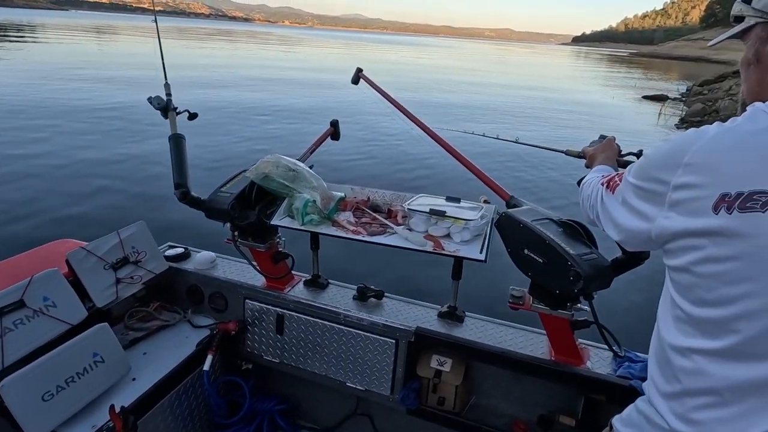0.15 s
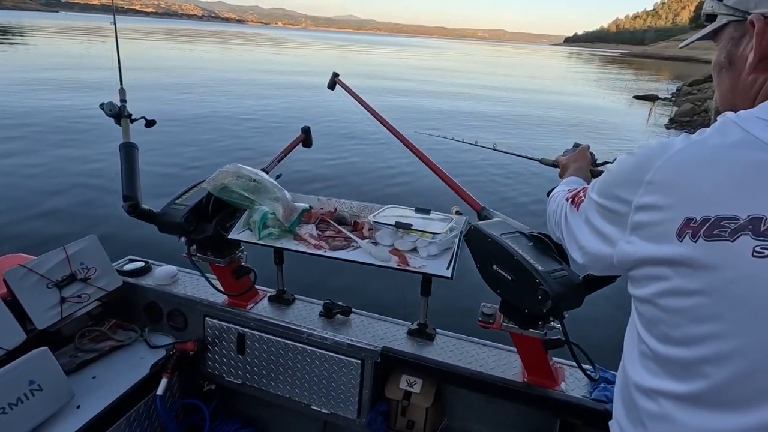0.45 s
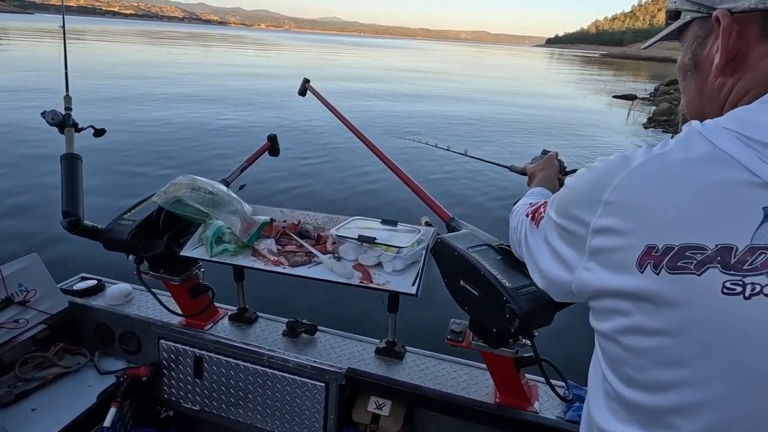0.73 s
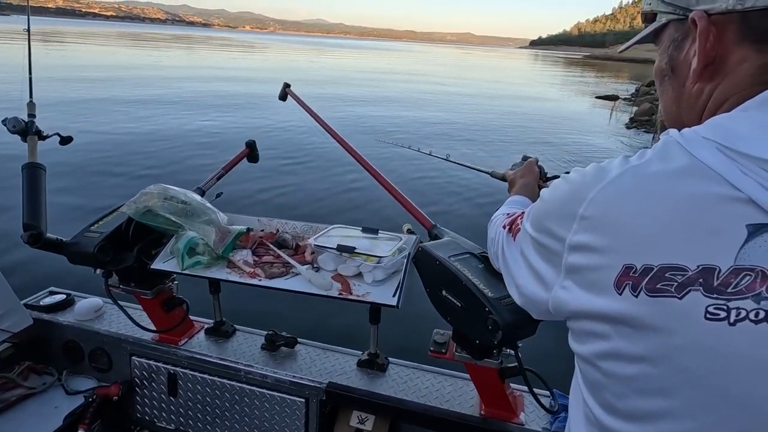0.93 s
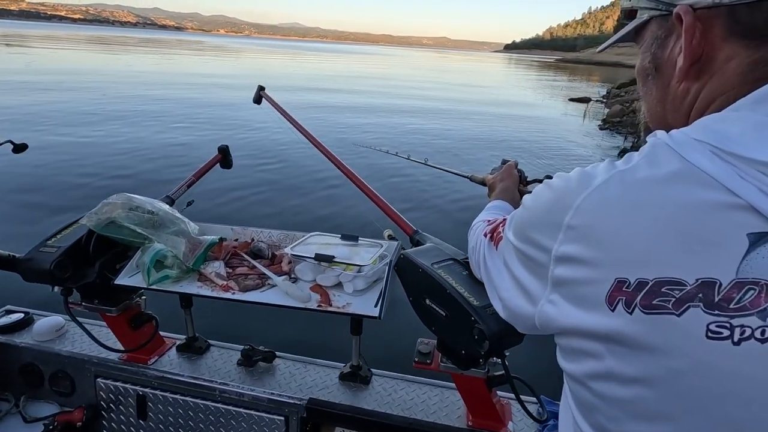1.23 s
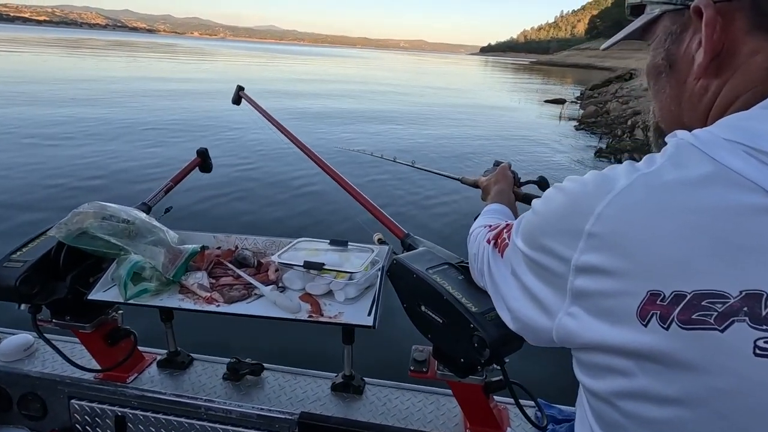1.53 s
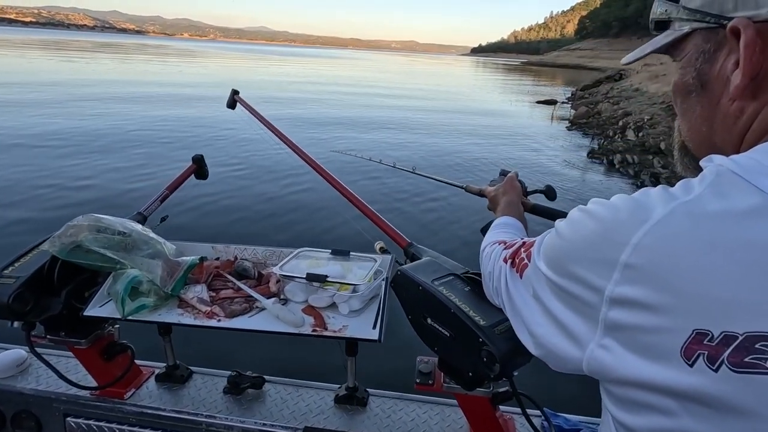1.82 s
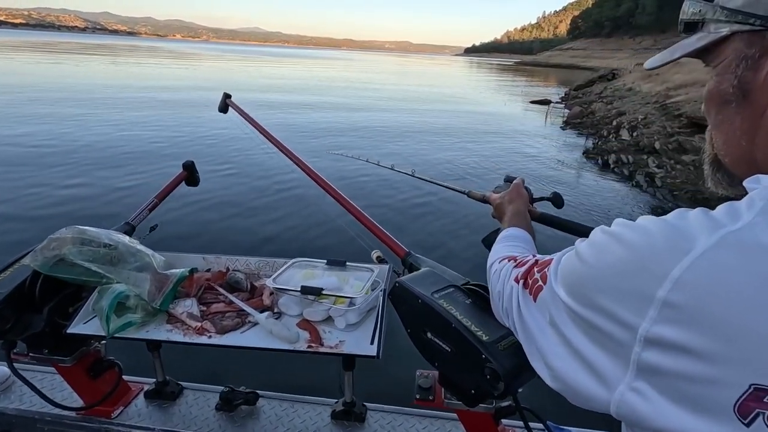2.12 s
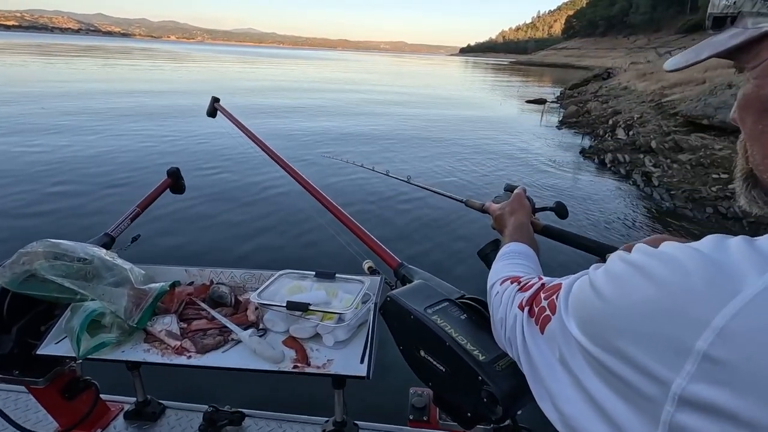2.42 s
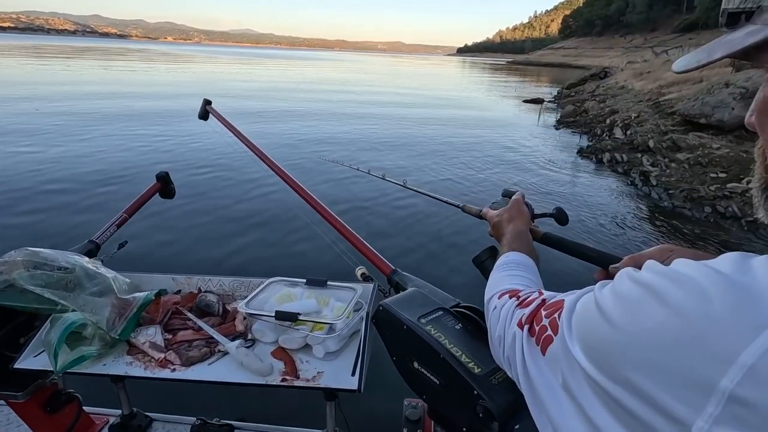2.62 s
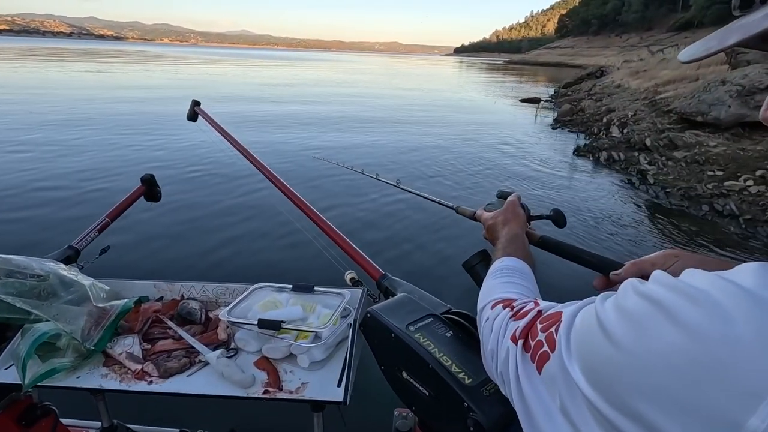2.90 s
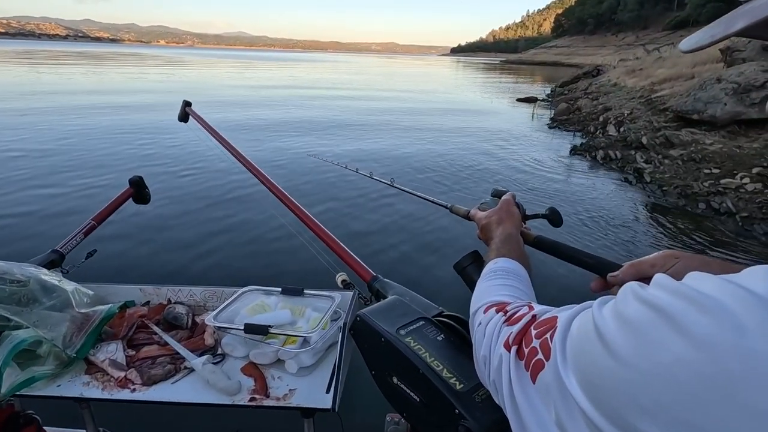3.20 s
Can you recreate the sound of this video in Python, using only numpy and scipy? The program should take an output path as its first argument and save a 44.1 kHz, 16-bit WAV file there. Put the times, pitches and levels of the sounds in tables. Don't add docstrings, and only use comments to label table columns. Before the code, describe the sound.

Knocking and clattering in an aluminium boat as an angler shifts and handles a rod over calm water

```python
import sys
import numpy as np
from scipy import signal
from scipy.fft import rfft, irfft
from scipy.io import wavfile
from scipy.ndimage import uniform_filter1d

SR = 44100
rng = np.random.default_rng(int(sys.argv[2]) if len(sys.argv) > 2 else 0)


def output_pcm(signal):
    pcm = np.clip(np.atleast_2d(signal).T, -1, 1) * 32767
    wavfile.write(sys.argv[1], SR, np.round(pcm).astype(np.int16))


def decibels_to_gain(level_db):
    exponent = np.asarray(level_db, float) / 20
    return 10 ** exponent


N = 147735

# freq_hz, level_db
AIR_SPECTRUM = [(30, -4.5), (70, -13), (110, -13.5), (170, -3), (400, -1.5), (600, -0.5), (900, -1.5),
                (4800, -14), (8000, -28), (10000, -59.5)]
# time_s, level_db
AIR_SWELL = [(0, 0.5), (.6, -1), (1.1, -2.5), (1.45, 3), (1.7, 4), (2.5, 3), (3.35, 0)]
AIR_DB, AIR_FIZZ_DB = -55.5, -84
MURMUR_FLICKER_DB, HISS_FLICKER_DB, FIZZ_FLICKER_DB = 2.5, 1.2, 0.83

SCRAPE_START_S = [0, .72, 1.77, 2.1, 2.13, 2.265, .39]
# swell_s, hold_s, fade_s, level_db
SCRAPES = [
    (0.019, 0.014, 0.033, -55.5),
    (0.05, 0.022, 0.14, -44.5),
    (0.022, 0.07, 0.15, -49.5),
    (0.013, 0.072, 0.043, -46),
    (0.017, 0.0088, 0.026, -36),
    (0.0015, 0.066, 0.089, -43),
    (0.0091, 0.038, 0.07, -58),
]
SCRAPE_PITCH_HZ = [2480, 1190, 1790, 1530, 5500, 3500, 4000]
SCRAPE_TREBLE_DB = [-39, -37, -51, -27.5, -42, -32, -50]
# freq_hz, level_db
CONTACT_BODY = [(240, -2), (400, 7), (1090, -8), (1330, -6), (3290, -9.5), (4020, -13), (6000, -22),
                (8000, -42.5), (10400, -60), (17600, -120)]
# freq_hz, level_db
DULL = [(6500, -2), (8500, -11), (14000, -48)]
TREBLE_HZ, TREBLE_WIDTH_HZ, GRIT_DB = 10800, 3500, 3

# freq_hz, level_db, t60_s
HULL_MODES = [(58, -18.5, 0.61), (90.4, -6, 0.25), (145.4, -11, 0.19), (187, -2, 0.14), (215.2, -5, 0.13),
              (265.5, -0.5, 0.087), (320.2, -5, 0.077), (393.4, -4, 0.099), (472, -18.5, 0.14),
              (517.6, -7.5, 0.14), (621, 1, 0.069), (795, -11, 0.13), (879, -11, 0.15)]
# start_s, peak_db, struck_hz, ring_ratio
KNOCKS = [(0.02, -43, 256, 1), (0.054, -40, 180, 1), (0.118, -22.5, 250, 1), (0.165, -24, 138, 0.12),
          (0.284, -12.5, 380, 0.55), (0.118, -39, 585, 0.39), (.185, -33, 410, .4), (1.469, -48, 65, 0.43),
          (2.41, -49, 109, 0.48), (2.163, -28.5, 775, 0.18), (0.564, -41, 208, 0.78),
          (1.452, -41, 186, 0.23), (1.52, -30, 344, 1), (1.975, -20.5, 172, 0.22),
          (2.175, -28.5, 232, 0.76), (2.258, -23, 270, 0.47), (2.262, -29, 560, 0.51),
          (2.335, -37, 324, 0.79), (2.701, -27.5, 315, 1)]
# start_s, peak_db, struck_hz, ring_ratio
FURTHER_KNOCKS = [
    (0.297, -17.5, 270, 0.82),
    (.316, -20.5, 270, 1.02),
    (0.769, -21.5, 190, 0.68),
    (0.784, -25.5, 181, 0.35),
    (1.542, -37, 187, 0.29),
    (2.035, -28.5, 280, 0.92),
    (2.211, -32, 203, 0.48),
    (2.731, -30, 270, 0.35),
]
REACH_OCT, PUSH_S = 0.62, 0.006
BOOM_DB, BOOM_T60_S, BOOM_HZ = -25, 0.7, 270

RUB_START_S = [.67, 1.752, 2.05, .13, 2.28, 1.8, .7, 2.07, 1.76]
# swell_s, hold_s, fade_s, level_db
RUBS = [
    (0.044, 0.1, 0.11, -38.5),
    (0.032, 0.18, 0.03, -34),
    (0.065, 0.1, 0.023, -38.5),
    (0.014, 0.22, 0.25, -39),
    (0.028, 0.063, 0.12, -43.5),
    (0.078, 0.25, 0.23, -42),
    (0.075, 0.032, 0.059, -39.5),
    (0.099, 0.014, 0.029, -40),
    (0.063, 0.11, 0.07, -40),
]
# slip_rate_hz, unevenness_ratio
RUB_SLIPS = [(190.2, 0.259), (63.14, 0.1245), (92.4, 0.31), (73.9, 0.243), (106.3, 0.366), (45.7, 0.335),
             (284, 0.396), (250, 0.65), (126.5, 0.1994)]
RUB_PITCH_HZ = [198, 280, 210, 134.4, 413, 78, 485, 690, 567]

# start_s, peak_db, pitch_hz, t60_s, treble_db
CLICKS = [(0.158, -33.5, 2600, 0.11, -53), (0.2403, -29, 1530, 0.12, -44),
          (0.2788, -13.5, 2750, 0.077, -43), (0.286, -19, 2560, 0.049, -55),
          (1.514, -28.5, 2700, 0.099, -51), (1.8439, -22, 2150, 0.022, -42),
          (1.8738, -22.5, 2440, 0.075, -59), (1.924, -23, 2110, 0.072, -51),
          (2.0319, -23.5, 1980, 0.053, -53), (2.0953, -37, 1590, 0.094, -41), (2.148, -32, 1730, 0.16, -42),
          (2.26, -29, 5130, 0.13, -18), (2.4287, -29.5, 2100, 0.089, -30), (2.5142, -44.5, 3500, 0.16, -17),
          (2.6943, -27.5, 1600, 0.17, -29), (2.7539, -14.5, 3360, 0.048, -15.5),
          (2.7738, -30.5, 4210, 0.089, -48), (2.866, -13, 1496, 0.086, -41),
          (3.0625, -25, 1950, 0.1, -37.5)]
CLICK_RISE_S, CLICK_RING_DB, CLICK_Q = 0.0044, -6, 3.9

# freq_hz, width_hz, level_db
REEL_BODY = [(1610, 31, -2), (2240, 50, 4.5), (2590, 24, -4.5), (3300, 60, -8), (3700, 64, -12),
             (4570, 41, -13), (4830, 51, -16), (5600, 25, -13), (7000, 41, -10)]
# freq_hz, width_hz, level_db
RATTLE_BODY = [(760, 47, 2), (1600, 41, -2), (1740, 23, -11), (1970, 33, -7), (2870, 240, -18)]
# freq_hz, width_hz, level_db
BUTT_BODY = [(604, 50, 4.5), (1367, 57, -9.5), (1540, 29, -12), (1860, 28, -15), (2110, 49, -7.5),
             (2600, 29, -8.5), (2990, 50, -17), (3665, 20, -12)]
# freq_hz, width_hz, level_db
BAIL_BODY = [(2210, 71, -4.5), (3120, 410, 4), (4390, 210, -1), (4850, 80, -13), (5190, 240, -10),
             (5860, 130, -10)]
# freq_hz, width_hz, level_db
RAIL_BODY = [(1620, 78, 3), (2115, 15, -3), (2520, 190, -1.5), (3160, 37, -2.5), (4150, 120, -19.5)]
SINGING_BODIES = [REEL_BODY, RATTLE_BODY, BUTT_BODY, BAIL_BODY, RAIL_BODY, RAIL_BODY]
SINGING_START_S = [2.262, 2.1, .279, 2.753, 2.865, 3.062]
# swell_s, hold_s, fade_s, level_db
SINGING = [
    (0.011, 0.096, .06, -46.5),
    (0.041, 0.048, 0.064, -44),
    (0.0072, 0.0063, 0.034, -24),
    (0.0021, 0.0087, 0.02, -24),
    (.003, 0.0045, 0.035, -27.5),
    (0.0014, 0.0029, 0.032, -40),
]
WASH_DB, WASH_T60_S, WASH_HZ = -25, 0.4, 900

# start_s, peak_db, pitch_hz
PINGS = [
    (0.385, -44, 4000),
    (0.588, -41, 1600),
    (1.265, -52, 4740),
    (1.165, -50, 2320),
    (1.319, -41, 4870),
    (1.417, -45.5, 3500),
    (1.846, -51.5, 6830),
    (2.83, -49, 7100),
    (2.851, -40, 5300),
]
# start_s, peak_db, pitch_hz
TICKS = [
    (1.2376, -55.5, 11200),
    (1.778, -56.5, 10370),
    (2.5262, -66, 11500),
    (2.605, -55.5, 10500),
    (2.846, -54, 10500),
    (2.991, -58, 11300),
    (3.1844, -61, 10800),
    (3.3197, -52.5, 10700),
]
TICK_T60_S = 0.018

# start_s, peak_db, struck_hz
CREAK_SLIPS = [(1.768, -35, 330), (1.791, -29, 344), (1.814, -26.5, 330), (1.842, -25.5, 294),
               (1.853, -24, 310), (1.873, -28, 352), (1.883, -23, 334), (1.91, -25, 284), (1.923, -30, 353),
               (1.934, -24, 290), (1.951, -29, 250)]
CREAK_RING, CREAK_PUSH_S = 0.35, 0.0015

# start_s, peak_db, first_hz, last_hz, length_s
BUBBLES = [
    (2.588, -48.5, 624, 900, 0.029),
    (2.602, -46.5, 850, 1190, 0.028),
    (2.619, -51, 477, 760, .03),
]

# start_s, peak_db
BLOWS = [
    (2.8645, -8),
    (3.0605, -15),
]
# delay_s, level_db, struck_hz, ring_ratio, push_s
BLOW_PARTS = [
    (.001, 0, 270, 0.49, 0.0014),
    (0.0104, -7, 250, 0.37, .003),
    (0.017, -5, 320, 1.26, .003),
    (.036, -4.5, 262, 0.2, .012),
    (.062, -20, 254, .25, .015),
    (.08, -23.5, 266, 6.7, .02),
]

NOTCH_HZ, NOTCH_WIDTH_HZ, NOTCH_DB = 9140, 1200, -6.5
# freq_hz, level_db
MIC = [(20, -30), (60, -4), (130, 0), (NOTCH_HZ - NOTCH_WIDTH_HZ, 0), (NOTCH_HZ, NOTCH_DB),
       (NOTCH_HZ + NOTCH_WIDTH_HZ, 0), (13000, -3), (14400, -20), (14700, -80)]


def colour(x, table):
    hz, db = np.array(table, float).T
    f = np.maximum(np.arange(len(x) // 2 + 1) * SR / len(x), 1)
    return irfft(rfft(x) * decibels_to_gain(np.interp(np.log(f), np.log(hz), db)), len(x))


def unit(x):
    return x / np.sqrt(np.mean(x ** 2))


def band(x, hz, width_hz):
    return signal.lfilter(*signal.iirpeak(min(hz, .45 * SR), max(hz / width_hz, .4), fs=SR), x)


def band_twice(x, hz, width_hz):
    return band(band(x, hz, width_hz), hz, width_hz)


def add(out, start_s, x):
    i = max(int(start_s * SR), 0)
    out[i:i + len(x)] += x[:N - i]


def walk(rate_hz, count=N):
    k = max(int(SR / rate_hz), 1)
    return uniform_filter1d(np.repeat(rng.standard_normal(count // k + 1), k), k)[:count]


def swell(start_s, rise_s, hold_s, fade_s, count=N):
    t = np.arange(count) / SR - start_s
    fall = np.clip((t - rise_s - hold_s) / fade_s, 0, 9)
    return np.clip(t / rise_s, 0, 1) ** 2 * decibels_to_gain(-30 * fall)


def diffuse(x, hz, width_hz, t60_s, build_s):
    t = np.arange(SR) / SR
    tail = band(rng.standard_normal(SR), hz, width_hz)
    tail *= decibels_to_gain(-60 * t / t60_s) * (1 - np.exp(-t / build_s))
    return signal.fftconvolve(x, tail / np.sqrt(np.sum(tail ** 2)))[:N]


def air():
    hiss = unit(colour(rng.standard_normal(N), AIR_SPECTRUM))
    murmur = band(band(hiss, 220, 300), 220, 400)
    rest = hiss - murmur
    bed = murmur * decibels_to_gain(MURMUR_FLICKER_DB * walk(10)) + rest * decibels_to_gain(HISS_FLICKER_DB * walk(18))
    fizz = unit(band_twice(rng.standard_normal(N), 11000, 3500)) * decibels_to_gain(FIZZ_FLICKER_DB * walk(11))
    time_s, level_db = np.array(AIR_SWELL).T
    level = decibels_to_gain(np.interp(np.arange(N) / SR, time_s, level_db))
    return (decibels_to_gain(AIR_DB) * unit(bed) + decibels_to_gain(AIR_FIZZ_DB) * fizz) * level


def gritty(count, hz, ring_db, treble_db, q):
    noise = rng.standard_normal((3, count)) * decibels_to_gain(GRIT_DB * walk(400, count=count))
    highpass = signal.butter(2, min(hz * 0.3, 5000.), "high", fs=SR)
    body = unit(colour(signal.lfilter(*highpass, noise[0]), CONTACT_BODY))
    ring = unit(colour(band(band(noise[1], hz, hz / q), hz, hz), DULL))
    fizz = unit(band_twice(noise[2], TREBLE_HZ, TREBLE_WIDTH_HZ))
    return unit(body + decibels_to_gain(ring_db) * ring) + decibels_to_gain(treble_db) * fizz


def scrapes():
    out, count = np.zeros(N), SR // 2
    events = zip(SCRAPE_START_S, SCRAPES, SCRAPE_PITCH_HZ, SCRAPE_TREBLE_DB)
    for start_s, (rise_s, hold_s, fade_s, db), hz, treble_db in events:
        shape = swell(0, rise_s, hold_s, fade_s, count=count)
        add(out, start_s, decibels_to_gain(db) * shape * gritty(count, hz, 0, treble_db, 1))
    return out


def strike(hz, ring, push_s=PUSH_S, reach_oct=REACH_OCT):
    t = np.arange(SR // 3)[:, None] / SR
    f, db, t60_s = np.array(HULL_MODES).T
    off_pitch_db = 8.76 * (np.log2(f / hz) / reach_oct) ** 2 * np.sqrt(push_s / PUSH_S)
    gain = decibels_to_gain(db - off_pitch_db) * (-1.) ** np.arange(len(f))
    decay = decibels_to_gain(-60 * t / (t60_s * max(ring, .1)))
    x = (gain * np.sin(2 * np.pi * f * t) * decay).sum(axis=1)
    x *= 1 - np.exp(-t[:, 0] / push_s)
    return x / np.abs(x).max()


def knocks():
    out = np.zeros(N)
    for start_s, db, hz, ring in KNOCKS + FURTHER_KNOCKS:
        add(out, start_s, decibels_to_gain(db) * strike(hz, ring))
    return out


def rubs():
    out = np.zeros(N)
    events = zip(RUB_START_S, RUBS, RUB_SLIPS, RUB_PITCH_HZ)
    for start_s, (rise_s, hold_s, fade_s, db), (rate_hz, uneven), hz in events:
        chance = rng.standard_normal((400, 2))
        slip_s = (np.cumsum(np.abs(1 + uneven * chance[:, 0])) - 1) / rate_hz
        at = (slip_s * SR).astype(int).clip(0, SR - 1)
        slips, rub = np.zeros(SR), np.zeros(N)
        slips[at] = decibels_to_gain(2 * chance[:, 1])
        response = strike(hz, 0.4, push_s=0.0038, reach_oct=0.78)
        add(rub, start_s, unit(signal.fftconvolve(slips, response)[:SR]))
        out += decibels_to_gain(db) * rub * swell(start_s, rise_s, hold_s, fade_s)
    return out


def clicks():
    out, t = np.zeros(N), np.arange(SR // 4) / SR
    for start_s, db, hz, t60_s, treble_db in CLICKS:
        decay = decibels_to_gain(-60 * t / t60_s) + decibels_to_gain(-48 - 15 * t / t60_s)
        shape = np.clip(t / CLICK_RISE_S, 0, 1) * decay
        burst = gritty(len(t), hz, CLICK_RING_DB, treble_db, CLICK_Q)
        add(out, start_s - .001, decibels_to_gain(db - 5.5) * shape * burst)
    return out


def singing():
    out, count = np.zeros(N), SR // 4
    for start_s, (rise_s, hold_s, fade_s, db), body in zip(SINGING_START_S, SINGING, SINGING_BODIES):
        ring = np.zeros(count)
        for hz, width_hz, part_db in body:
            tone = unit(band(rng.standard_normal(count), hz, width_hz))
            ring += decibels_to_gain(part_db + 3.2 * walk(60, count=count)) * tone
        shape = swell(0, rise_s, hold_s, fade_s, count=count)
        add(out, start_s, decibels_to_gain(db) * shape * unit(colour(ring, DULL)))
    return out


def pings_and_ticks():
    out, t = np.zeros(N), np.arange(SR // 4) / SR
    for start_s, db, hz in TICKS + PINGS:
        tone = np.sin(2 * np.pi * hz * t)
        noise = unit(band_twice(rng.standard_normal(len(t)), hz, hz / 3))
        add(out, start_s, decibels_to_gain(db - 2.5) * decibels_to_gain(-60 * t / TICK_T60_S) * (tone + noise))
    return out


def creak():
    out = np.zeros(N)
    for start_s, db, hz in CREAK_SLIPS:
        add(out, start_s, decibels_to_gain(db) * strike(hz, CREAK_RING, CREAK_PUSH_S))
    return out


def bubbles():
    out = np.zeros(N)
    for start_s, db, first_hz, last_hz, length_s in BUBBLES:
        t = np.arange(int(length_s * SR)) / (length_s * SR)
        phase = 2 * np.pi * np.cumsum(first_hz * (last_hz / first_hz) ** t) / SR
        add(out, start_s, decibels_to_gain(db) * np.sin(np.pi * t) * np.sin(phase))
    return out


def blows():
    out = np.zeros(N)
    for start_s, db in BLOWS:
        for delay_s, part_db, hz, ring, push_s in BLOW_PARTS:
            add(out, start_s + delay_s, decibels_to_gain(db + part_db) * strike(hz, ring, push_s))
    return out


def scene():
    hull = knocks() + rubs() + creak() + blows()
    boom = decibels_to_gain(BOOM_DB) * diffuse(hull, BOOM_HZ, 590, BOOM_T60_S, 0.0076)
    gear = scrapes() + clicks() + singing() + pings_and_ticks()
    wash = decibels_to_gain(WASH_DB) * diffuse(gear, WASH_HZ, 1200, WASH_T60_S, 0.008)
    return (hull + boom + gear + wash + bubbles() + air())[None]


def band_limit(x):
    return signal.sosfilt(signal.butter(12, 14500, fs=SR, output="sos"), x)


def record(dry):
    mix = colour(dry[0], MIC)[None]
    return band_limit(mix)


dry = scene()
out = record(dry)
output_pcm(out)
```